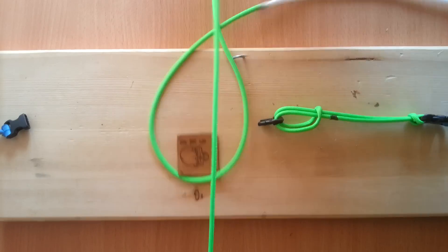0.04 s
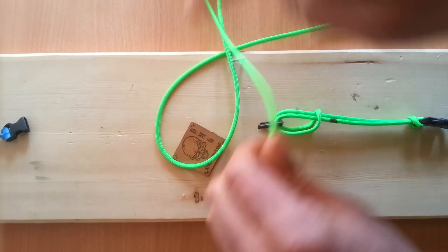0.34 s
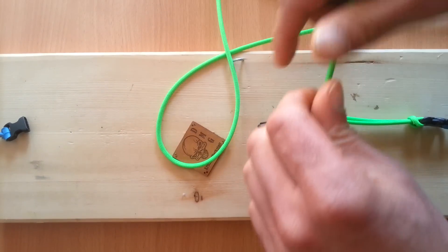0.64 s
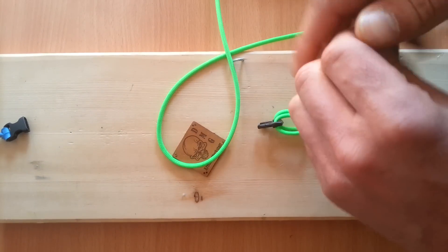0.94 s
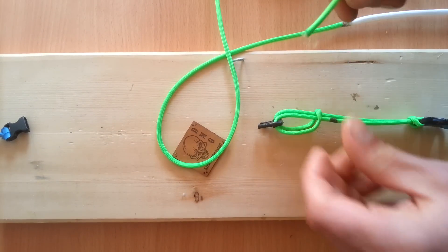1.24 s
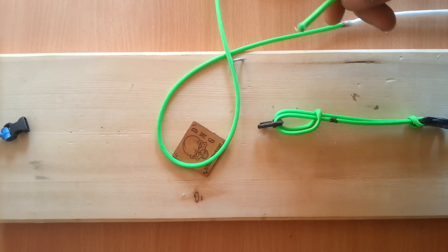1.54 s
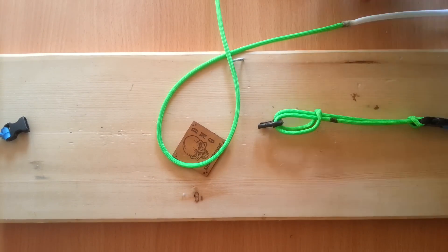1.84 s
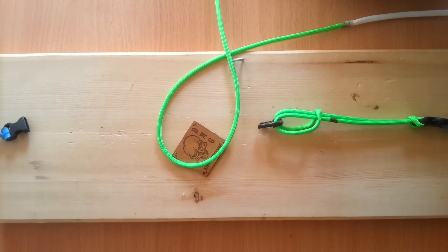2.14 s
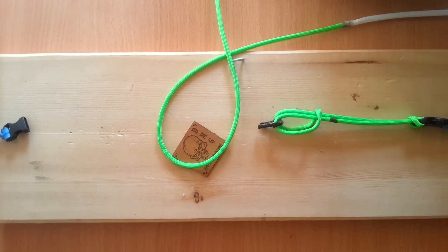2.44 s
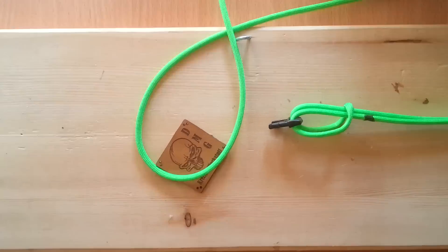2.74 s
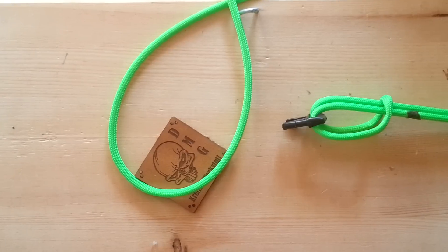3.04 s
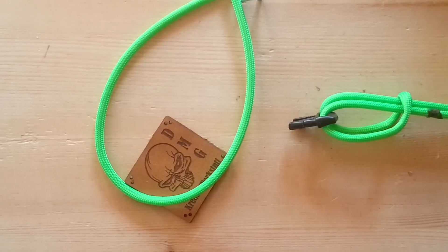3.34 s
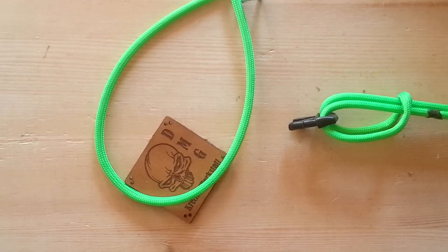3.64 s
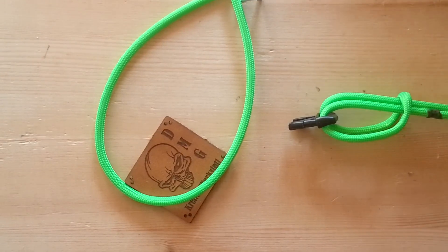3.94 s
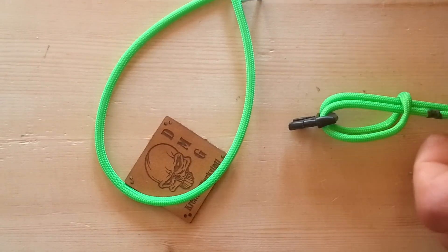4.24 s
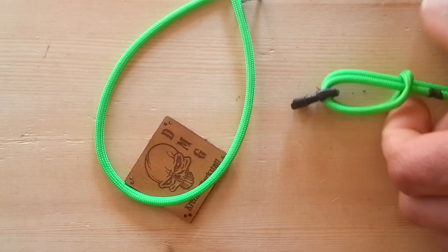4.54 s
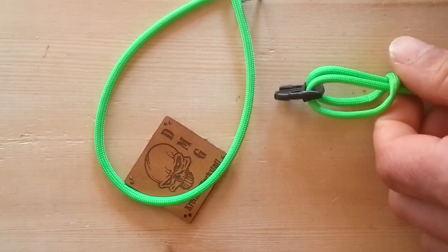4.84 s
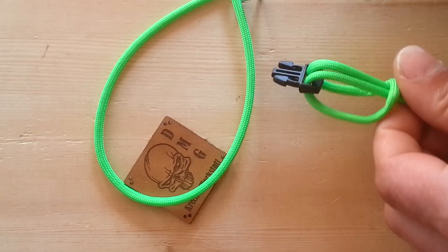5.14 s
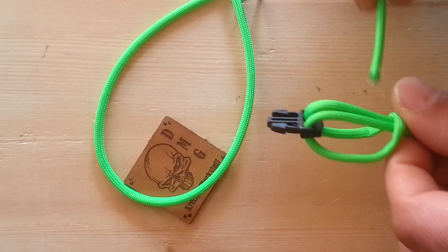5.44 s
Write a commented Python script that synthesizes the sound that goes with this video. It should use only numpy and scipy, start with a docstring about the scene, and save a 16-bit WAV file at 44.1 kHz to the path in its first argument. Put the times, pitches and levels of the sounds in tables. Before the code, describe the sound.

Right at the start, nylon cord swishes loudly over a camera stand, very close to the microphone and mostly on the right. From 0.1 to 0.35 seconds it rustles, snaps and jolts the mount, making the stand ring briefly. The mount rocks to rest in quick, weakening knocks, and the cord flicks again at about 0.6 and 0.8 seconds. A lull follows with only faint rubbing. At 2.3 seconds fingers make a double click on the plastic camera case, then softer clicks and brushes. A sharp click comes at 3.2 seconds, followed by a tiny rising finger squeak. Something small ticks lightly on a wooden board near 3.85 seconds. A soft cord flick and bump at 4.3 seconds trail into faint rubbing, and another soft flick comes at 5.4. Throughout, the small room hums quietly, with a thin hiss that lifts slightly with each sound.

```python
"""A small room with a camera on a stand over a wooden board, where nylon cord is laid out. The cord swishes
over the stand in tiny slips that ring it, then flicks and jolts it close to the right microphone port;
the mount rocks to rest. Later fingers click and brush the camera and something small ticks on the board,
over a low room hum and a hiss that lifts with each sound."""
import sys
import numpy as np
from scipy import signal
from scipy.fft import rfft, irfft
from scipy.io import wavfile
from scipy.ndimage import uniform_filter1d

SR = 44100
rng = np.random.default_rng(int(sys.argv[2]) if len(sys.argv) > 2 else 0)


def generate_wav(signal):
    """Clip the signal to [-1, 1] and save it as 16-bit WAV at the path in sys.argv[1]."""
    frames = np.transpose(np.atleast_2d(signal))
    scaled = np.clip(frames, -1, 1) * 32767
    pcm = np.round(scaled).astype(np.int16)
    wavfile.write(sys.argv[1], SR, pcm)


N = 250346
TIME = np.arange(N) / SR

# Stand modes: f/Hz, level/dB, t60/s
STAND_MODES = [(376, -31, 0.027), (491.5, -1, 0.13), (590, 1.5, 0.033), (650, -2.5, .1), (719.5, 3, 0.06),
               (774, -4.5, 0.22), (877, -12.5, .1), (1005, -7, 0.091), (1118, -11, 0.093),
               (1224, -2, 0.047), (1312, -3.5, 0.056), (1498, -11.5, .06), (1648, -7, .1), (1820, 3, 0.032),
               (1970, -10.5, 0.13), (2080, -7, .09), (2103, 0.5, 0.053), (2280, -8, .06), (2240, -8.5, .06),
               (2440, -8, 0.013), (2496, -14, .05), (2850, -7, 0.072), (3080, -26, .04), (3450, -10, 0.075),
               (3590, -19, 0.12), (3700, -12, 0.045), (4290, -13.5, 0.063)]
# Sway and boom of the camera mount: f/Hz, level/dB, t60/s
MOUNT_MODES = [(127.6, -15.5, 0.077), (182.3, -9.5, 0.11), (226, -2, 0.063), (277, -0.5, .035),
               (376, 0, 0.028), (475.7, -6.5, .06), (560, -18, 0.043)]
# Cord or skin sliding on the stand, faster is brighter: t/s, length/s, level/dB, cutoff/Hz
STROKES = [(0, 0.081, -36.5, 1210), (0.102, .027, -10.5, 2880), (.125, 0.033, -23, 1610),
           (0.156, .029, -12, 1490), (0.238, 0.0078, -19, 2660), (0.288, 0.023, -29, 3300),
           (0.313, 0.035, -32, 1300), (.539, 0.01, -37, 1310), (.625, 0.039, -41.5, 590),
           (0.681, 0.49, -58.5, 850), (1.798, 0.17, -56, 1790), (1.921, 0.037, -45, 600),
           (2.383, 0.024, -47, 3000), (2.476, 0.015, -37.5, 3000), (2.586, 0.026, -35.5, 1960),
           (2.799, 0.015, -50.5, 1200), (3.075, 0.013, -43, 1450), (3.212, 0.0275, -35, 575),
           (3.285, 0.023, -40, 840), (3.31, 0.057, -46.5, 1400), (3.403, .012, -45, 2960),
           (3.577, 0.039, -51.5, 1420), (4.294, 0.0244, -44, 740), (4.509, 0.057, -47.5, 910),
           (4.531, 0.27, -53.5, 680), (5.428, 0.068, -56, 756)]
def rubs(slips_per_s=2500, scatter_db=3, boom_db=-6.5, scrape_db=-14, scrape_hz=7000, edge_s=0.0049):
    """The braid catches and slips: dense, uneven jerks ring the stand and shake the mount."""
    out = np.zeros(N)
    stand, mount = ring(STAND_MODES, spread_s=.002), ring(MOUNT_MODES, spread_s=.004)
    # each swing of the mount scuffs the stand just before landing
    scuffs = [(s - 0.0074, 0.015, db - 28, 1530) for s, db, _ in swings()]
    for s, length_s, db, hz in STROKES + scuffs:
        t = TIME[:int(length_s * SR)]
        slips = rng.random(SR // 2)[:len(t)] < slips_per_s / SR
        direction, size = rng.standard_normal((2, SR // 2))[:, :len(t)]
        fade_s = edge_s + length_s ** 2
        grip = np.clip(np.minimum(t, length_s - t) / fade_s, 0, 1)
        jerks = slips * np.sign(direction) * undb(scatter_db * size) * grip
        ringing = soften(signal.fftconvolve(jerks, stand), hz)
        boom = soften(signal.fftconvolve(jerks, mount), hz)
        scrape = soften(soften(jerks, scrape_hz), scrape_hz)
        sing_db = 4 - 10 * np.log2(hz / 1400) ** 2  # strongest at mid stroke speed
        parts = (ringing, 0), (boom, boom_db), (sing(grip, db), sing_db), (scrape, scrape_db)
        for sound, part_db in parts:
            add(out, s, undb(db + part_db) * sound * np.sqrt(len(t)) / np.linalg.norm(sound))
    return out


def sing(grip, stroke_db, slip_hz=792, drag_hz=44, mode_hz=780, t60_s=.11, waver=0.031):
    """Slips lock to a stand mode, which swells and rings on; hard strokes drag the pitch flat."""
    t = TIME[:SR // 2]
    wander = soften(rng.standard_normal(len(t)), 60)
    pitch_hz = (slip_hz - drag_hz * undb(stroke_db / 5)) * (1 + waver * wander / rms(wander))
    drive = np.sin(2 * np.pi * np.cumsum(pitch_hz) / SR)[:len(grip)]
    mode = decay(t, t60_s) * np.sin(2 * np.pi * mode_hz * t)
    return signal.fftconvolve(grip * drive, mode)


# Cord flicks: t/s, level/dB, cutoff/Hz
FLICKS = [(.108, -7.5, 2400), (.589, -9.5, 1860), (.638, -20.5, 2420), (.762, -14, 1970),
          (4.294, -27, 2610), (5.421, -29.5, 2000)]
# Flick force spectrum: f/Hz, level/dB
FLICK_FORCE = [(400, -7.5), (750, -8), (1250, 5.5), (1700, -6), (2800, -1)]
def flicks():
    """The cord strikes the stand, driving its middle modes best."""
    return tint(blows(FLICKS, ring(STAND_MODES, spread_s=0.00084)), FLICK_FORCE)


# Jolts of the mount: t/s, level/dB, cutoff/Hz
MOUNT_JOLTS = [(.117, -5, 606), (.163, -3.5, 623), (0.253, -14, 250), (0.2678, -7.5, 218),
               (.3258, -1.5, 634), (0.55, -19, 245), (.579, -18, 205), (2.3381, -21, 304),
               (4.301, -28.5, 300)]
def knocks(push_s=0.003, rattle_gain=.8):
    """The loose mount takes each jolt or landing as a short, rattling push."""
    out, t, mount = np.zeros(N), TIME[:SR // 4], ring(MOUNT_MODES)
    push = np.exp(-t / push_s)
    for s, db, hz in MOUNT_JOLTS + swings():
        rattle = soften(rng.standard_normal(len(t)), hz) * push
        boom = soften(mount * (1 - push), hz)
        knock = unit_peak(boom) + rattle_gain * unit_peak(rattle)
        add(out, s, undb(db) * unit_peak(knock))
    return tint(out, [(40, -30), (90, -4.5), (160, -2.5), (230, 3.5), (480, 0), (650, 3), (1500, -9)])


def swings(count=4, start_s=.368, gap_s=.048, shrink=.88, first_db=-8, loss_db=3, first_hz=300):
    """The mount rocks between its stops, landing sooner, weaker and duller: t/s, level/dB, cutoff/Hz."""
    k = np.arange(count)
    gaps_s = gap_s * shrink ** k
    landings_s = start_s + np.cumsum(gaps_s) - gaps_s
    return list(zip(landings_s, first_db - k * loss_db, first_hz * np.exp(-0.17 * k)))


# Snaps against the camera: t/s, level/dB, t60/s, tilt/(dB/octave)
CAMERA_SNAPS = [(.118, -14, 0.025, 1.5), (.125, -13.5, 0.042, 1), (.179, 2, 0.014, 0.5),
                (.328, -10.5, 0.014, -35), (.4683, -23, 0.018, 1.5), (3.233, -26.5, 0.02, 4.5),
                (4.35, -36, 0.0045, 10.5)]
# Snap resonances: f/Hz, width/Hz, level/dB, left minus right/dB
SNAP_BANDS = [(2096, 1520, -2, -22.5), (3200, 5200, -16.5, -16), (7430, 1400, -14, -20),
              (13000, 3500, -19.5, -11)]
def snaps():
    """Sharp hits on the camera chatter close to the right port."""
    return chatter(CAMERA_SNAPS, SNAP_BANDS)


# Plastic case modes: f/Hz, level/dB, t60/s
CASE_MODES = [(218, -18.5, 0.24), (318, -4.5, 0.04), (432, 8.5, 0.019), (466, -15.5, 0.19),
              (549, -10.5, 0.076), (830, -28, 0.26), (1200, -0.5, .01), (1640, -4, 0.011),
              (2280, -14, 0.021), (3140, -19, 0.013), (7300, 11, 0.0012), (12500, -18, .001)]
# Knocks and button clicks on the case: t/s, level/dB, cutoff/Hz
CASE_CLICKS = [(0.3288, -4, 700), (2.3144, -10, 1020), (2.3342, -12, 2050), (2.5154, -21.5, 880),
               (2.649, -26, 2300), (2.8541, -28, 905), (3.158, -35, 1300), (3.211, -26, 2500),
               (3.2256, -2, 4800)]
def clicks():
    """Fingers and buttons ring the plastic case."""
    return blows(CASE_CLICKS, ring(CASE_MODES))


# Fingertip glide on the case: t/s, f/Hz, level/dB
SQUEAK_GLIDE = [(3.284, 1584, -58), (3.294, 1720, -38.5), (3.312, 2180, -42), (3.322, 2150, -39)]
def squeak(waver=0.067, wander_hz=494):
    """Skin slips quickly and unevenly, rising in pitch."""
    s, hz, db = np.transpose(SQUEAK_GLIDE)
    wander = soften(rng.standard_normal(N), wander_hz)
    pitch_hz = np.interp(TIME, s, hz) * (1 + waver * wander / rms(wander))
    envelope = undb(np.interp(TIME, s, db)) * (TIME > s[0]) * (TIME < s[-1])
    return envelope * np.sin(2 * np.pi * np.cumsum(pitch_hz) / SR)


# Ticks on the board: t/s, level/dB, t60/s, tilt/(dB/octave)
BOARD_TICKS = [(2.08, -48.5, 0.019, 11), (3.8463, -30.5, 0.02, -4)]
# Tick resonances: f/Hz, width/Hz, level/dB, left minus right/dB
TICK_BANDS = [(1202, 700, 1.5, 4), (1670, 3800, -2, -7)]
def ticks():
    """Something small and hard chatters lightly on the board."""
    return chatter(BOARD_TICKS, TICK_BANDS)


def walls(x, t60_s=.25, wet_db=-28, cutoff_hz=3500):
    """The small room returns a faint, dull tail."""
    t = TIME[:SR // 2]
    tail = soften(rng.standard_normal((2, len(t))), cutoff_hz) * decay(t, t60_s)
    tail /= np.linalg.norm(tail[0])
    return undb(wet_db) * signal.fftconvolve(x.mean(axis=0)[None], tail, axes=1)[:, :N]


# Room noise spectrum: f/Hz, level/dB
HUM_SPECTRUM = [(18, -42.5), (30, -23), (113, -13), (149, 3.5), (166, -3.5), (181, -9.5), (323, -18),
                (426, -15.5), (455, -21.5), (495, -16), (627, -21), (777, -21), (846, -21), (1120, -27.5),
                (5000, -41), (6500, -75), (11000, -120)]
def room_hum(level_db=-55.3):
    """Low room noise, most alike at the two ports in the bass."""
    mid = tint(rng.standard_normal(N), HUM_SPECTRUM)
    side = tint(rng.standard_normal(N), HUM_SPECTRUM)
    side = tint(side, [(40, -1), (150, -6.5), (400, 0), (1200, -1.5), (4000, 1.5)])
    hum = undb(level_db) * np.array([mid + side, mid - side]) / rms(mid)
    return tint(hum, [(1500, 0), (3000, -7.5), (6000, -20)])


# Microphone noise spectrum: f/Hz, level/dB
HISS_SPECTRUM = [(1500, 2.5), (3000, -2), (4300, -3.5), (9000, -2), (14500, -2.5)]
def hiss(lift_db, closed_db=-54.5, left_db=-2.06):
    """Microphone noise, lifted as the suppressor opens."""
    noise = tint(rng.standard_normal((2, N)), HISS_SPECTRUM)
    return undb(closed_db + lift_db) * undb([[left_db], [0]]) * noise / rms(noise)


def suppressor_lift_db(x, threshold_db=-60.5, slope=0.17, max_db=5.5, release_db_per_s=99, window_s=.01):
    """The noise suppressor opens at once with the sound above 800 Hz and closes slowly."""
    upper = signal.sosfilt(signal.butter(2, 800, "high", fs=SR, output="sos"), x)
    power = uniform_filter1d(np.sum(upper ** 2, axis=0), int(window_s * SR))
    level_db = 10 * np.log10(np.maximum(power, 1e-12))
    release_db = release_db_per_s * TIME
    held_db = np.maximum.accumulate(level_db + release_db) - release_db
    return np.clip(slope * (held_db - threshold_db), 0, max_db)


def ring(modes, spread_s=0):
    """Unit-energy impulse response of a body; bending waves arrive over spread_s."""
    hz, db, t60_s = np.transpose(modes)[:, :, None]
    t = TIME[:SR // 4] - spread_s * rng.random(hz.shape)
    partials = (t >= 0) * undb(db) * decay(t, t60_s) * np.cos(2 * np.pi * hz * t)
    response = partials.sum(axis=0)
    return response / np.linalg.norm(response)


def blows(hits, body):
    """Single blows ring a body; softer contacts are duller."""
    out = np.zeros(N)
    for s, db, hz in hits:
        add(out, s, undb(db) * unit_peak(soften(body, hz)))
    return out


def chatter(hits, bands, damping=.55):
    """A small hard part chatters in broad resonances; higher ones die sooner."""
    out, t = np.zeros((2, N)), TIME[:SR // 10]
    for s, db, t60_s, tilt_db in hits:
        for hz, width_hz, band_db, pan_db in bands:
            ratio = hz / bands[0][0]
            burst = rng.standard_normal(len(t)) * decay(t, t60_s / ratio ** damping)
            low_hz = np.hypot(hz, width_hz / 2) - width_hz / 2
            high_hz = min(low_hz + width_hz, SR / 2 - 1000)
            sound = signal.sosfilt(signal.butter(3, [low_hz, high_hz], "band", fs=SR, output="sos"), burst)
            peak_db = db + band_db + tilt_db * np.log2(ratio)
            add(out, s, undb([[peak_db + pan_db], [peak_db]]) * unit_peak(sound))
    return out


def ports(x, left_colour, lag_s):
    """Shaking reaches the right port fully, the left faintly and later."""
    left = np.interp(TIME - lag_s, TIME, tint(x, left_colour))
    return np.array([left, x])


def tint(x, points, size=4096):
    """Filter by (f/Hz, level/dB) points; minimum phase keeps attacks sharp."""
    hz, db = np.transpose(points)
    bins_hz = np.maximum(np.fft.rfftfreq(size, 1 / SR), 1)
    gain = undb(np.interp(np.log(bins_hz), np.log(hz), db))
    cepstrum = irfft(np.log(gain))
    half = len(cepstrum) // 2
    causal = np.r_[cepstrum[0], 2 * cepstrum[1:half], np.zeros(half)]
    response = irfft(np.exp(rfft(causal)))[None, :half]
    return signal.oaconvolve(np.atleast_2d(x), response, axes=1)[:, :N].reshape(x.shape)


def soften(x, hz):
    """Second-order low-pass."""
    return signal.sosfilt(signal.butter(2, min(hz, SR / 2 - 1000), fs=SR, output="sos"), x)


def add(track, s, sound):
    """Mix in a sound from time s."""
    i = max(int(s * SR), 0)
    track[..., i:i + sound.shape[-1]] += sound[..., :N - i]


def decay(t, t60_s):
    return np.exp(-np.log(1000) * t / t60_s)


def undb(db):
    return 10 ** (np.asarray(db) / 20)


def rms(x):
    return np.sqrt(np.mean(x ** 2))


def unit_peak(x):
    return x / np.abs(x).max()


# Path from stand to microphone: f/Hz, level/dB
STAND_PATH = [(100, -3), (350, 0.5), (3500, -2), (4800, -8.5), (6000, -11.5), (14000, -20.5)]
def scene():
    """Stand, mount and case heard through the camera body; ticks and room through the air."""
    stand = tint(flicks() + rubs() + squeak(), STAND_PATH)
    stand = ports(stand, [(150, -17), (420, -15.5), (750, -25), (1500, -28), (4000, -24)], lag_s=0.00056)
    body = knocks() + clicks()
    body = ports(body, [(150, -19), (280, -18.5), (500, -24), (1500, -18.5), (6000, -20)], lag_s=0.00055)
    near = stand + body + snaps() + ticks()
    near = tint(near, [(30, -33), (60, -12), (120, -0.5)])  # a small body radiates little deep bass
    return near + walls(near) + room_hum() + hiss(suppressor_lift_db(near))


# Microphone response with its port notch: f/Hz, level/dB
MIC_RESPONSE = [(4400, 0.5), (5900, -5.5), (7200, -2.5)]
def record(dry, bass_hz=55, ceiling=.97, top_hz=14750):
    """The camera colours the sound, thins the bass, clips peaks and cuts the top."""
    coloured = tint(dry, MIC_RESPONSE)
    thin = signal.sosfilt(signal.butter(1, bass_hz, "high", fs=SR, output="sos"), coloured)
    clipped = np.clip(thin, -ceiling, ceiling)
    return signal.sosfilt(signal.ellip(10, .2, 70, top_hz, fs=SR, output="sos"), clipped)


dry = scene()
out = record(dry)
generate_wav(out)
```